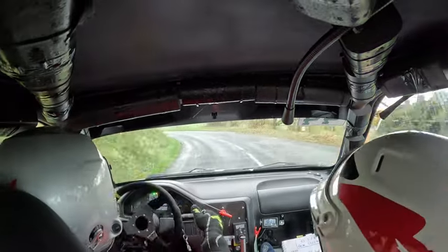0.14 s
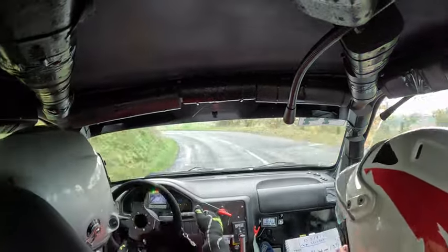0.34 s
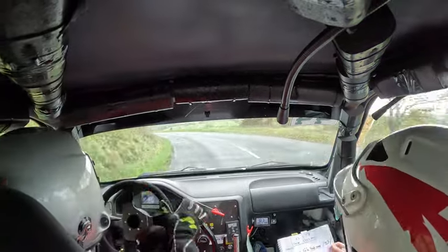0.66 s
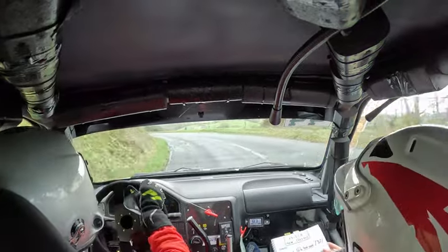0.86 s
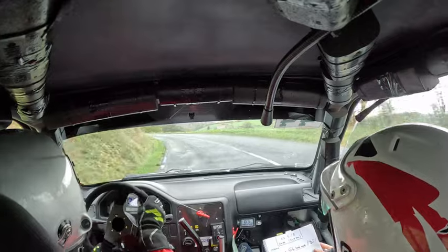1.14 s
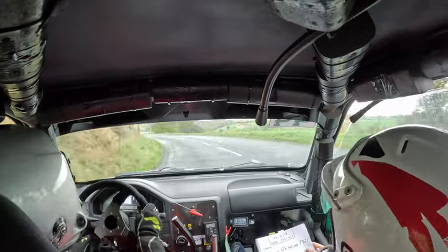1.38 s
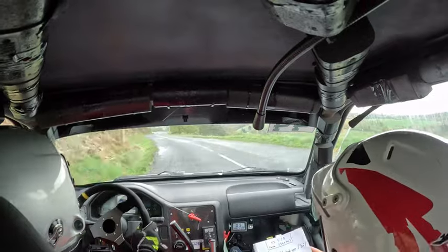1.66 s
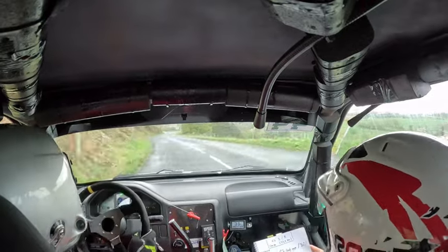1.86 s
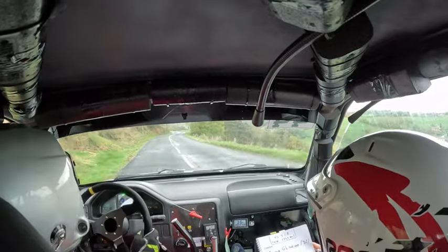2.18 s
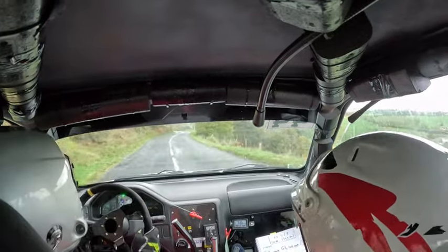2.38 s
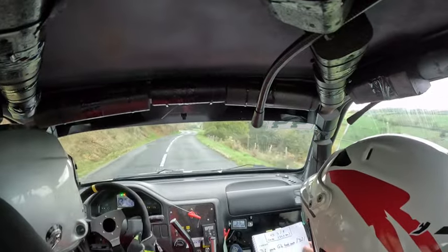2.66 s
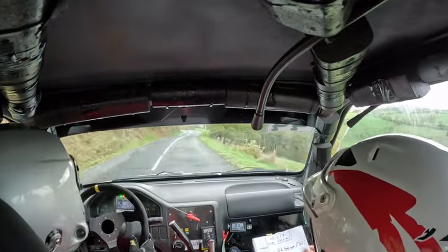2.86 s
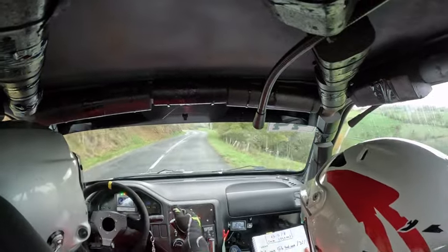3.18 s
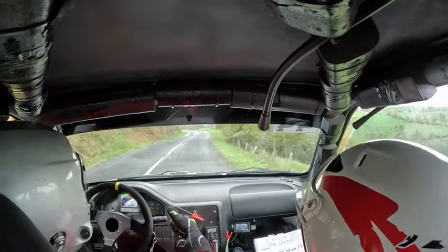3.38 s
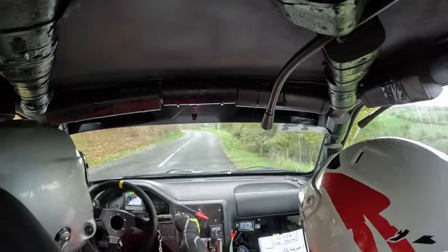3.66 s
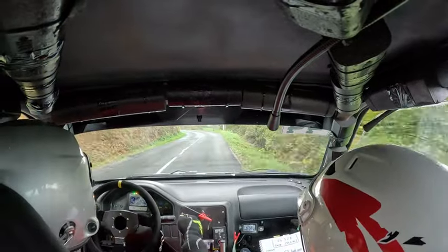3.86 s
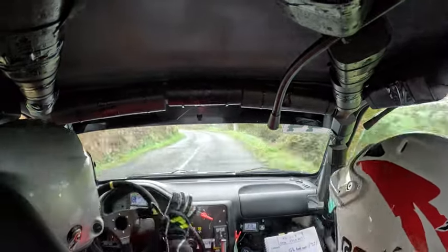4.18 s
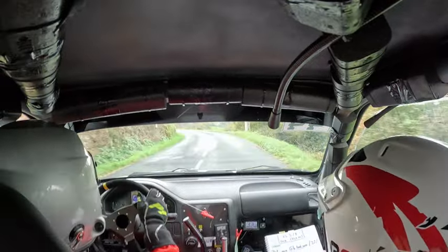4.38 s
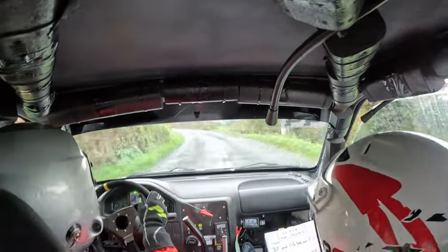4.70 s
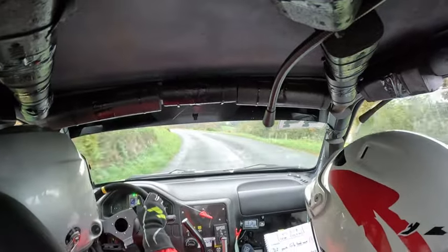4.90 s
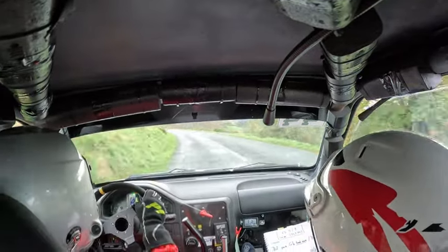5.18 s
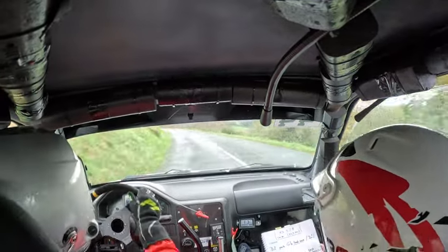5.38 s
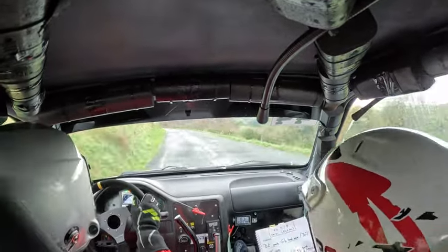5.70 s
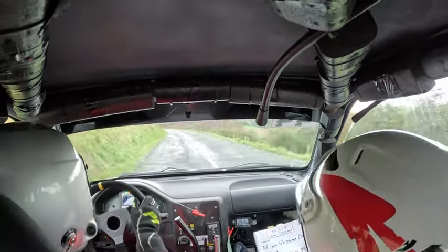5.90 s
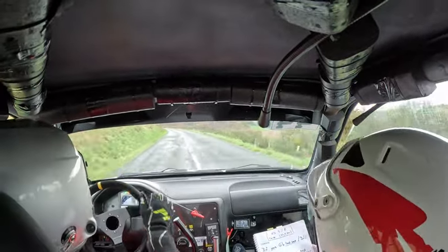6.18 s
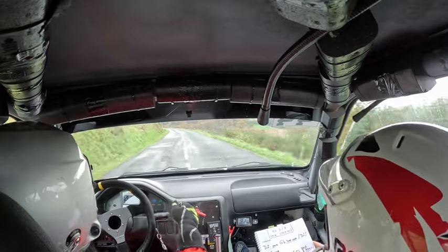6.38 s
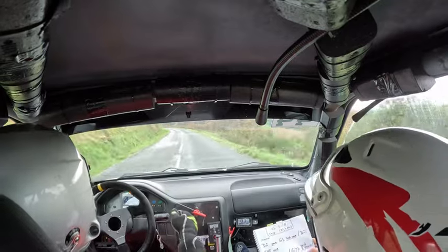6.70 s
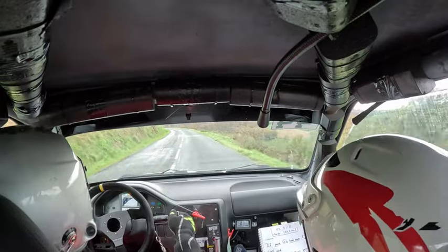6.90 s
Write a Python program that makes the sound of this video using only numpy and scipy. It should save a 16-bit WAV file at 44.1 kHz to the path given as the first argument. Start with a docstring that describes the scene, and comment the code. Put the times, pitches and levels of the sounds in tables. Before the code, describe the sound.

Inside a stripped race car, a hard, high-revving engine drone climbs, drops at two snappy gear changes, with tyre scrub and rattles.

```python
"""Rally car flat out, from inside

A four-cylinder rally car runs flat out on a country road, heard in its bare cabin, with two quick upshifts.
The firing note booms in the body shell and unequal cylinders add lines between its harmonics.
Noise pulsed by the firings makes the exhaust roar and the valve-gear hiss; more shaped noise makes the tyres.
Short noise flurries are the loose fittings and dull knocks, and gliding tones chirp in the shifts."""
import sys
import numpy as np
from scipy import signal
from scipy.fft import rfft, irfft, next_fast_len
from scipy.io import wavfile
from scipy.ndimage import uniform_filter1d, minimum_filter1d, map_coordinates

SR = 44100
rng = np.random.default_rng(int(sys.argv[2]) if len(sys.argv) > 2 else 0)


def waveform_to_disk(signal):
    """Save audio, clipped to [-1, 1], as 16-bit WAV at the path in sys.argv[1]."""
    frames = np.transpose(np.atleast_2d(signal))
    scaled = np.clip(frames, -1, 1) * 32767
    samples = np.round(scaled).astype(np.int16)
    wavfile.write(sys.argv[1], SR, samples)


N = 310905
TIME = np.arange(N) / SR   # seconds


def from_db(db):
    """Decibels to gain."""
    return 10 ** (np.asarray(db) / 20)


def rms_one(x):
    """Scale to unit power."""
    return x / np.sqrt(np.mean(x ** 2) + 1e-20)


def in_time(rows):
    """A curve of (seconds, value) rows, joined by straight lines with softened corners, at every sample."""
    seconds, values = np.transpose(rows)
    return uniform_filter1d(np.interp(TIME, seconds, values), size=441)


def drift(rate_hz):
    """Random wander of unit power that changes about rate_hz times a second: low-passed noise."""
    step = 40   # samples between the points that are drawn
    pole = np.exp(-2 * np.pi * rate_hz * step / SR)
    noise = rng.standard_normal(N // step + 2002)
    slow = signal.lfilter([1], [1, -2 * pole, pole * pole], noise)[2000:]   # skip the filter's start
    return np.interp(np.arange(N) / step, np.arange(len(slow)), rms_one(slow))


def bump(centre_s, half_length_s):
    """A smooth bump of height 1 around a moment."""
    return np.exp(-((TIME - centre_s) / half_length_s) ** 2)


def resonant_lift(hz, resonances):
    """Summed dB that a set of resonances adds at each frequency."""
    return sum(lift_db / (1 + (2 * (hz - centre) / width) ** 2) for centre, width, lift_db in resonances)


def coloured(x, spectrum, resonances=()):
    """Give an excitation a broad spectrum with resonant lifts; rms 1."""
    size = next_fast_len(N)
    hz = np.maximum(np.fft.rfftfreq(size, 1 / SR), 1)
    points_hz, points_db = np.transpose(spectrum)
    db = np.interp(np.log(hz), np.log(points_hz), points_db) + resonant_lift(hz, resonances)
    return rms_one(irfft(rfft(x, size) * from_db(db), size)[:N])


def strokes(turns, depth):
    """A swell once per turn, of unit power."""
    return rms_one(np.exp(depth * np.cos(2 * np.pi * turns)))


def engine_line(turns, flutter, flutter_hz):
    """One tone, near unit power, whose strength and phase flutter with uneven burning."""
    phase = 2 * np.pi * (turns + rng.random())
    line = (1 + flutter * drift(flutter_hz)) * np.sin(phase) + flutter * drift(flutter_hz) * np.cos(phase)
    return line * np.sqrt(2 / (1 + 2 * flutter ** 2))


# Engine speed, one list each for the low, middle and high gear, with the fall at each shift.
# Each row: time in seconds, firings per second before shudder.
GEAR_REVS = [
    [(0, 233.1), (.59, 255.8), (.66, 248.6), (.72, 228), (.78, 222.1)],
    [(.83, 208.8), (.89, 214.2), (1.03, 211.5), (1.33, 216), (1.44, 223.5), (1.62, 223.5), (1.78, 220.9),
     (2.4, 226.4), (2.62, 231.7), (3.15, 242.7), (3.38, 249.3), (3.85, 257.8), (4.08, 253), (4.14, 226.1)],
    [(4.17, 215.2), (4.23, 220.1), (4.46, 221.6), (5.27, 233.6), (5.49, 238.3), (5.75, 240.2), (6.16, 245),
     (6.3, 248.2), (6.6, 251.5), (6.95, 257), (7.05, 249.8)],
]


def engine_speed():
    """Firings per second as the car climbs through three gears."""
    return in_time(np.vstack(GEAR_REVS))


# Throttle lifts, for the two upshifts and once more at the end.
# Each row: start in seconds, end in seconds.
SHIFTS = [(.66, .82), (3.91, 4.17), (6.991, 7.3)]


def throttle_lift():
    """0 on full throttle, 1 in the middle of a lift, with quick ramps between."""
    return sum(np.clip(np.minimum(TIME - start, end - TIME) / 0.023 + .5, 0, 1) for start, end in SHIFTS)


# Tyres working through the bend. Each row: time in seconds, level in dB.
CORNER = [(0, -56), (.6, -46), (.85, -29), (1.2, -31.5), (1.75, -26), (2.1, -40.5), (3.0, -54.5)]


def cornering_level():
    """Level in dB of the tyres' scrub from the load of the bend."""
    return in_time(CORNER)


# Roughness of the road, as its rumble. Each row: time in seconds, level in dB before offset and jolts.
ROAD = [(0.0, -31.5), (0.25, -33.5), (0.27, -44.5), (0.63, -28.5), (1.41, -23.5), (1.59, -30.5),
        (1.69, -32), (2.35, -37.5), (3.06, -35.5), (3.26, -38.5), (3.32, -40), (3.65, -30.5), (3.71, -30),
        (4.18, -24), (4.34, -32), (4.46, -33.5), (4.65, -39.5), (4.81, -35), (5.14, -35), (5.2, -29.5),
        (6.87, -27), (7.05, -24.5)]


def road_level():
    """Roughness of the road over time, in dB."""
    return in_time(ROAD)


# How the gas roar and the valve hiss grow. Columns: base in dB at low revs, dB more at high revs,
# dB more in the bend, dB more off the throttle, dB per dB of road rumble, random surge in dB.
ROAR_LAW = (-25, 3, 4.5, 1.5, 0.4149, 1.0)
HISS_LAW = (-35, 3, 1, -2, 0.1847, 0)
# The rasp flares at the top of the middle gear. Columns: time in seconds, half length in seconds, rise in dB.
FLARE = (3.86, .16, 1.9)
REVS_POWER = 1.1   # noise climbs ever faster towards the top of the revs


def effort_db(law, revs, bend, off_throttle, bumps_db):
    """Noise level in dB: follows revs, bend, throttle and rough road, with any random surge."""
    base_db, revs_db, bend_db, lifted_db, road_share, surge_db = law
    flare_s, flare_half_s, flare_db = FLARE
    db = base_db + flare_db * bump(flare_s, flare_half_s)
    db += revs_db * revs ** REVS_POWER + bend_db * bend
    db += lifted_db * off_throttle + road_share * bumps_db
    return db + surge_db * drift(3.5)


# A harmonic swells or sags briefly.
# Each row: time in seconds, half length in seconds, multiple of the firing rate, change in dB.
SWELLS = [(0.04, 0.18, 1, -2.5), (0.09, 0.22, 2, 6), (.35, .12, 6, 2), (.58, .08, 2, -4.5),
          (0.682, 0.025, 1, -7.5), (0.785, 0.022, 1, -11), (1.324, .04, 1, -5), (1.43, 0.013, 2, 5),
          (1.763, 0.096, 1, -5.5), (2.37, 0.028, 3, -21), (3.063, 0.034, 1, -9), (3.398, .15, 6, 1.5),
          (3.65, .15, 1, -5.5), (3.85, 0.23, 2.25, 3.5), (3.906, 0.014, 1, 7), (4.023, 0.011, 1, 6.5),
          (4.302, .25, 3.5, 5.5), (4.35, .25, 2, 1), (4.55, 0.74, .5, 7), (5.1, .12, 4, 3.5),
          (5.45, .04, 1, -3.5), (5.713, 0.019, 1, 8), (5.835, 0.11, 1, 13.5), (6.0, 0.46, 5, 4.5),
          (6.05, 0.41, 1, -18.5), (6.76, 0.021, 1, 3), (6.917, 0.018, 1, 9), (7.05, 0.023, 1, 9)]


def swell_db(multiple):
    """dB by which one harmonic of the firing rate swells or sags over time."""
    return sum(db * bump(s, half_s) for s, half_s, which, db in SWELLS if which == multiple)


# How loud each strong harmonic is in the cabin as the revs carry it along, before the changes below.
# Each row: frequency in Hz, level in dB.
DRONE = [(105, -30.5), (111, -36), (117, -43.5), (122, -27.5), (128, -20)]
BOOM = [(211, -28.5), (216, -25), (220, -11.5), (226, -10), (232, -11), (238, -13), (244, -15), (256, -18)]
SECOND = [(420, -22), (445, -19), (470, -20.5), (500, -20), (516, -23)]
THIRD = [(630, -21), (655, -21), (675, -25.5), (690, -36), (704, -26), (724, -19), (770, -19.5)]
# The strong harmonics, in the order of the four responses above. Each row: multiple of the firing rate,
# change off the throttle in dB, offsets in the low, middle and high gear in dB.
HARMONICS = [(.5, -2, -2, -2.5, -0.24), (1, 0.5, 2.3, 0.31, 0.32), (2, -3.5, -0.53, 1.4, -1.7),
             (3, -4.5, -2.2, -1.8, 0.037)]
BOOM_WAVER_DB, BOOM_WAVER_HZ = -24, 22   # ragged part of the boom at full unrest


def firing_note(firings, firing_hz, unrest, off_throttle):
    """Strong harmonics follow the cabin's response: clean in a calm pull, ragged on bumps and off the throttle."""
    gear = np.searchsorted([end for start, end in SHIFTS], TIME)
    phase = 2 * np.pi * firings
    waver = drift(BOOM_WAVER_HZ) * np.sin(phase) + drift(BOOM_WAVER_HZ) * np.cos(phase)
    out = from_db(BOOM_WAVER_DB) * np.minimum(unrest, 1) ** 2 * waver
    for response, (multiple, lifted_db, *gears_db) in zip((DRONE, BOOM, SECOND, THIRD), HARMONICS):
        db = np.interp(multiple * firing_hz, *np.transpose(response))
        db += lifted_db * off_throttle
        db += uniform_filter1d(np.take(gears_db, gear), size=2205)   # blends the gears over 50 ms
        db += swell_db(multiple)
        flutter = (0.046 + .09 * unrest) * max(multiple, 1) ** .5
        flutter += 0.61 * max(multiple - 1, 0) * off_throttle   # upper harmonics break up
        out += from_db(db) * engine_line(multiple * firings, flutter, flutter_hz=20.4)
    return out


# Weaker engine lines, before resonances and swells.
# Each row: multiple of the four-stroke cycle rate, dB at low revs, dB at high revs.
WEAK_LINES = [(3, -37, -32.5), (5, -36, -28.5), (6, -27.5, -35.5), (7, -41.5, -48.5), (9, -41, -37.5),
              (10, -51.5, -35.5), (11, -37, -39.5), (13, -38, -36.5), (14, -39.5, -40.5), (15, -48, -51.5),
              (16, -32, -39.5), (17, -48.5, -55), (18, -53.5, -43), (19, -54.5, -52), (20, -47, -42),
              (22, -53.5, -50.5), (24, -49, -45.5), (26, -53.5, -53), (28, -50.5, -45.5), (30, -53, -54),
              (32, -55, -56.5), (36, -56.5, -51.5), (40, -57.5, -55), (44, -60.5, -50), (48, -54, -51)]
# Body resonances that the weaker lines glide through. Each row: centre in Hz, width in Hz, lift in dB.
BODY = [(182.3, 7.8, 9.5), (302.7, 14, 4.5), (360.3, 30, 8.5), (575.6, 13, 7.5), (651, 17, 6.5),
        (773, 38, 7.5), (980, 45, 2), (1076, 40, 10), (1218, 20, 8.5), (1482, 45, 8.5), (2140, 60, 8.5)]


def cylinder_lines(cycles, firing_hz, revs, unrest, off_throttle):
    """Unequal cylinders repeat every cycle; each line swells as the revs carry it through a resonance."""
    out, revs_hz = np.zeros(N), np.arange(200, 270)
    for multiple, low_db, high_db in WEAK_LINES:
        firing_multiple = multiple / 4   # four firings a cycle
        db = low_db + (high_db - low_db) * np.minimum(revs, 1)
        db += np.interp(firing_hz, revs_hz, resonant_lift(firing_multiple * revs_hz, BODY))
        db += swell_db(firing_multiple) - 2 * off_throttle
        out += from_db(db) * engine_line(multiple * cycles, 0.07 + .23 * unrest, flutter_hz=8)
    return out


# Spectrum of the exhaust gas. Each row: frequency in Hz, relative density in dB per Hz.
ROAR = [(90, -20.5), (150, -7), (235, -3.5), (400, -7.5), (520, -13), (700, -12.5), (900, -5.5),
        (1020, -23), (1300, -21), (2000, -72)]
# Resonances of cabin and exhaust. Each row: centre in Hz, width in Hz, lift in dB.
CABIN = [(231.4, 51, 10.5), (329, 40, 4.5), (468, 32, 9.5), (609, 93, 10), (788, 20, 6), (961.5, 30, 8)]


def exhaust_roar(firings):
    """Turbulent gas leaves in a puff on each firing and rings the cabin."""
    puffs = rng.standard_normal(N) * strokes(firings, depth=0.86)
    return coloured(puffs, ROAR, CABIN)


# Spectrum of valve gear and intake. Each row: frequency in Hz, relative density in dB per Hz.
HISS = [(600, -16.5), (1100, 0), (1380, -6), (1700, -3.5), (2400, -7.5), (3300, -9), (4000, -13.5),
        (4600, -20), (5400, -22), (7000, -32), (10500, -49), (12500, -38.5), (15500, -53)]
# Panel resonances heard in the hiss. Each row: centre in Hz, width in Hz, lift in dB.
PANELS = [(1029.5, 110, 5), (1210, 31, 5.5), (1528, 37, 8), (1744, 50, 3.5), (2032, 150, 5), (2100, 63, -3),
          (2486, 70, 3.5), (2970, 130, 0.5), (3720, 63, 0), (5240, 200, 1.5)]


def mechanical_hiss(cycles, firings):
    """Valve gear repeats one clatter every cycle; intake air adds fresh noise, and both pulse with the firings."""
    clatter = rng.standard_normal(512)   # one cycle of the valve gear
    repeating = map_coordinates(clatter, [cycles % 1 * len(clatter)], order=3, mode="grid-wrap")
    air = rng.standard_normal(N) * from_db(1.1 * drift(25))
    pulsing = strokes(firings, depth=0.061) * strokes(firings / 2, depth=0.072) * strokes(cycles, depth=0.047)
    return coloured((air + .42 * repeating) * pulsing, HISS, PANELS)


# Spectra of the road rumble and the tyre scrub. Each row: frequency in Hz, relative density in dB per Hz.
RUMBLE = [(12, -20.5), (25, 19.5), (36, 16.5), (55, 15), (80, 6.5), (110, -4), (150, -1.5), (210, -18.5),
          (400, -64)]
SCRUB = [(50, -17), (100, -8), (150, 1), (200, -7.5), (330, -25), (900, -27), (1300, -20.5), (1700, -20),
         (2400, -32), (4000, -47), (7000, -72)]
ROAD_DB, JOLT_DB = 1, 1   # offset of the rumble; its random swing
DRUM_DB, DRUM_REVS_DB = -5, 4   # drumming relative to the road level at low revs; dB more at high revs


def tyres(road_db, corner_db, revs):
    """Tyres rumble and drum on the road, drumming more as the revs climb; loaded in the bend, they scrub harder."""
    rumble_gain = from_db(road_db + ROAD_DB + JOLT_DB * drift(3))
    rumble = rumble_gain * coloured(rng.standard_normal(N), RUMBLE)
    drum_gain = from_db(road_db + DRUM_DB + DRUM_REVS_DB * revs)
    scrub_gain = np.hypot(from_db(corner_db), drum_gain)   # the two add in power
    return rumble + scrub_gain * coloured(rng.standard_normal(N), SCRUB)


RISE_SHARE = .42   # a jolt builds up in this share of its decay time


def flurries(events, spectrum, grain_db):
    """Each jolt sets off a short flurry of tiny contacts: grainy noise under a fast rise and decay."""
    shake = np.zeros(N)
    for s, db, decay_s in events:
        away = np.maximum((s - TIME) / RISE_SHARE, TIME - s) / decay_s
        shake += from_db(db) * np.exp(-np.minimum(away, 20))
    contacts = rng.standard_normal(N) * from_db(grain_db * drift(250))
    return shake * coloured(contacts, spectrum)


# Fittings shaken by bumps. Each row: time in seconds, level in dB, decay in seconds.
RATTLES = [(.520, -46, .035), (.62, -49, .02), (.79, -51, .012), (.823, -44, .016), (.931, -40, .014),
           (1.00, -50, .02), (1.045, -45, .022), (1.137, -47, .016), (1.174, -38.2, .026),
           (1.211, -43, .008), (1.442, -46, .01), (1.557, -45, .022), (1.815, -45, .02), (3.603, -47, .008),
           (3.85, -50, .08), (4.065, -45, .025), (4.266, -45, .015), (5.642, -44, .018)]
# Spectrum of the fittings. Each row: frequency in Hz, relative density in dB per Hz.
RATTLE = [(1200, -10.5), (3000, 10.5), (5000, 3.5), (7000, -2), (8800, -6), (10500, -19.5), (13000, -7.5),
          (16000, -13)]


def loose_fittings():
    """Loose fittings buzz against their mounts in bright flurries."""
    return flurries(RATTLES, RATTLE, grain_db=0.5)


# Brief gliding chirps during the shifts.
# Each row: start in seconds, end in seconds, from Hz, to Hz, level at the middle in dB.
CHIRPS = [(0.666, 0.715, 620, 570, -19), (0.689, 0.843, 677, 840, -29.5), (3.923, 3.991, 935, 722, -20.5),
          (4.10, 4.157, 556.5, 440, -18.5)]


def shift_chirps():
    """Short ragged glides that swell and die."""
    out = np.zeros(N)
    for start, end, from_hz, to_hz, db in CHIRPS:
        swell = np.sin(np.pi * np.clip((TIME - start) / (end - start), 0, 1))
        turns = np.cumsum(np.interp(TIME, (start, end), (from_hz, to_hz))) / SR
        out += from_db(db) * swell * engine_line(turns, 0.17, flutter_hz=30)
    return out


# Dull knocks, most of them during the shifts. Each row: time in seconds, level in dB, decay in seconds.
KNOCKS = [(.685, -22.5, .03), (1.28, -24.5, .025), (3.87, -23, .03), (3.95, -24.5, .021), (4.05, -28, .03),
          (4.11, -22.5, .03), (4.18, -20.5, 0.027), (5.5, -23.5, 0.068), (5.61, -28.5, 0.03)]
# Spectrum of the knocks. Each row: frequency in Hz, relative density in dB per Hz.
KNOCK = [(80, -6.5), (330, -4.5), (500, 0.5), (900, -0.5), (1300, -14.5), (2300, -12), (3500, -25),
         (6000, -38.5), (10000, -55)]


def dull_knocks():
    """Dull flurries of knocking, at the shifts and now and then between them or after."""
    return flurries(KNOCKS, KNOCK, grain_db=-1.5)


LOW_REVS_HZ, HIGH_REVS_HZ = 226, 250   # firings per second
BEND_SHUDDER = .004   # spread, as a share, of the crank speed as the wheels skip in the bend


def scene():
    """Engine, road and rattles mixed to one channel."""
    firing_hz = engine_speed()
    # 0 at low revs, 1 at high revs, and a little beyond
    revs = np.maximum(firing_hz - LOW_REVS_HZ, 0) / (HIGH_REVS_HZ - LOW_REVS_HZ)
    corner_db, road_db = cornering_level(), road_level()
    bend = from_db(corner_db - corner_db.max())   # 1 at the hardest cornering
    off_throttle = throttle_lift()
    bumps_db = road_db - road_db.mean()
    roar_db = effort_db(ROAR_LAW, revs, bend, off_throttle, bumps_db)
    hiss_db = effort_db(HISS_LAW, revs, bend, off_throttle, bumps_db)
    unrest = from_db(roar_db + 19)   # the engine runs rougher as its roar grows
    # driveline shudder makes the crank speed waver, most when the load comes off
    shudder = (.0006 + 0.00225 * unrest) * drift(12)
    shudder += (.015 * off_throttle + BEND_SHUDDER * bend) * drift(40)
    firings = np.cumsum(firing_hz * (1 + shudder)) / SR
    cycles = firings / 4
    engine = firing_note(firings, firing_hz, unrest, off_throttle)
    engine += cylinder_lines(cycles, firing_hz, revs, unrest, off_throttle)
    roar = from_db(roar_db) * exhaust_roar(firings)
    hiss = from_db(hiss_db) * mechanical_hiss(cycles, firings)
    road = tyres(road_db, corner_db, revs)
    rattles_and_knocks = loose_fittings() + dull_knocks()
    return (engine + roar + hiss + road + rattles_and_knocks + shift_chirps())[None]


def limiter(x, ceiling_db, release_db_per_s):
    """Gain ducks smoothly just ahead of each peak above the ceiling and recovers steadily."""
    over = np.maximum(20 * np.log10(np.abs(x) + 1e-9) - ceiling_db, 0)
    ramp = release_db_per_s * TIME
    held = np.maximum.accumulate(over + ramp, axis=-1) - ramp
    gain_db = minimum_filter1d(-held, size=201)
    return x * from_db(uniform_filter1d(uniform_filter1d(gain_db, size=121), size=81))


CUTOFF_HZ = 15750


def record(dry):
    """Peaks are limited, then a steep low-pass cuts the top."""
    limited = limiter(dry, ceiling_db=-2.4, release_db_per_s=120)
    low_pass = signal.ellip(10, .1, 80, CUTOFF_HZ, fs=SR, output="sos")
    return signal.sosfilt(low_pass, limited)


dry = scene()
out = record(dry)
waveform_to_disk(out)
```